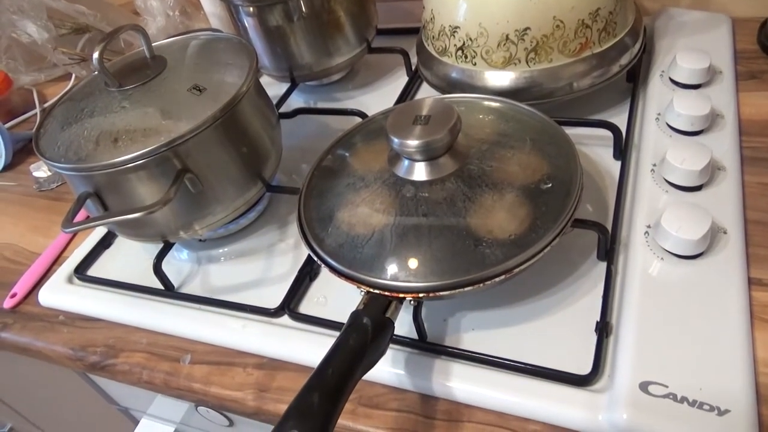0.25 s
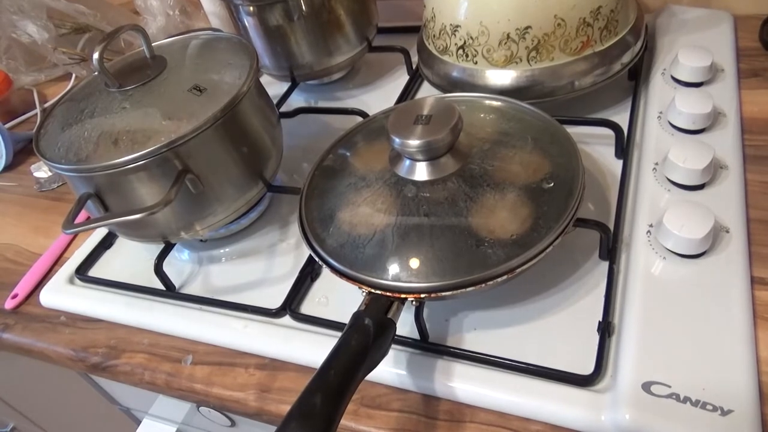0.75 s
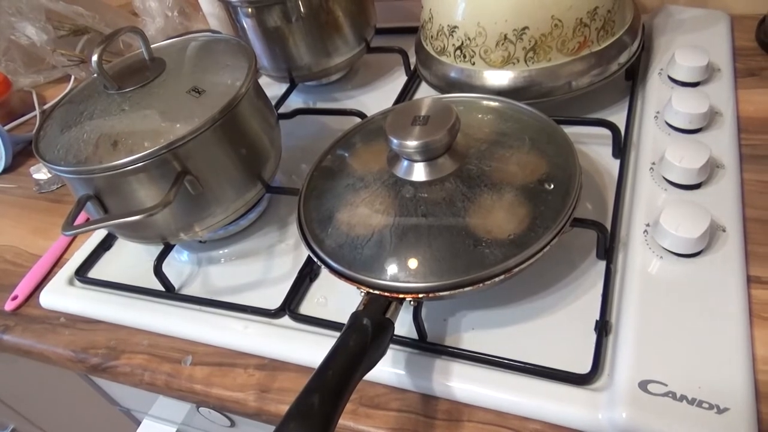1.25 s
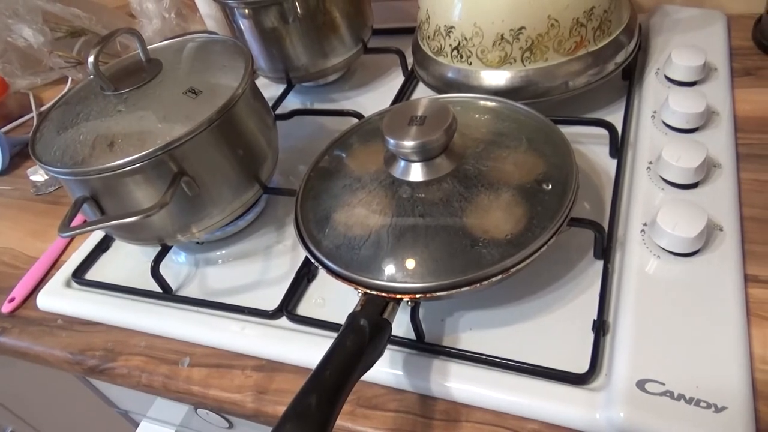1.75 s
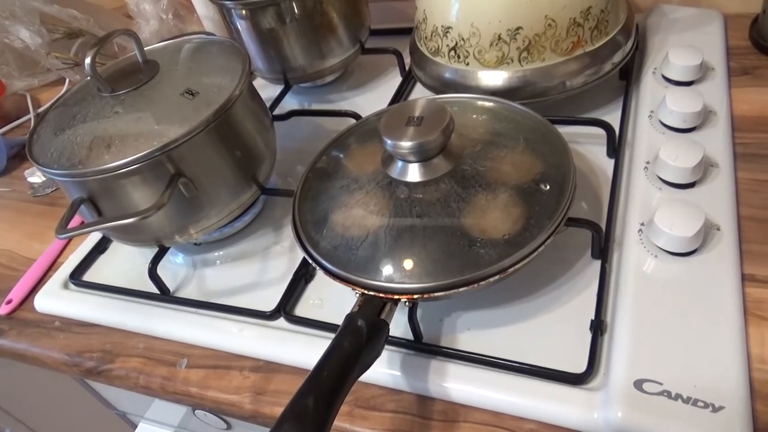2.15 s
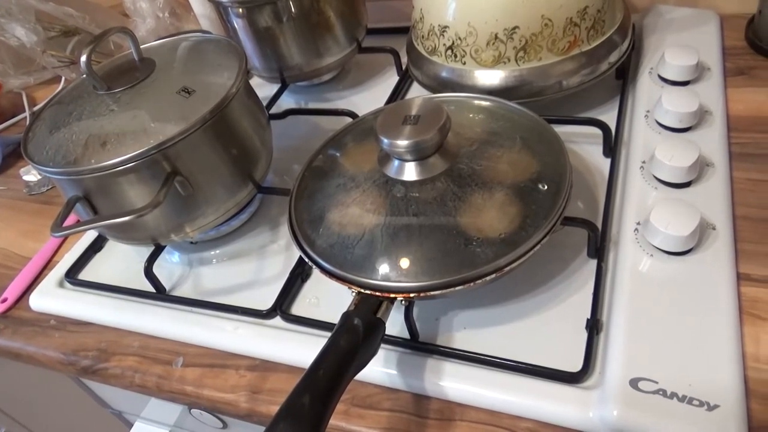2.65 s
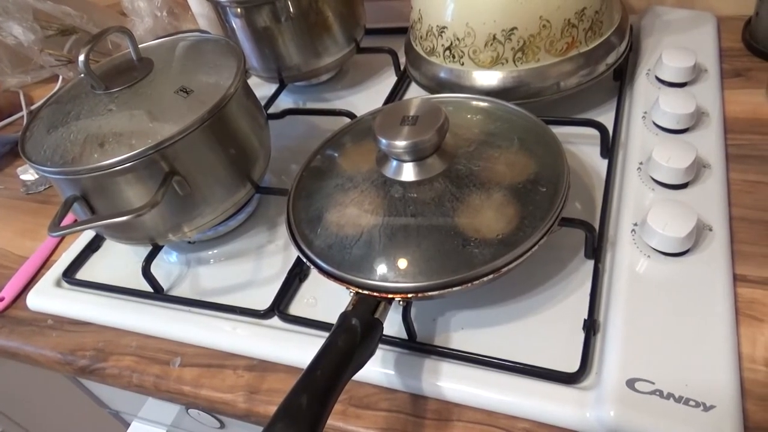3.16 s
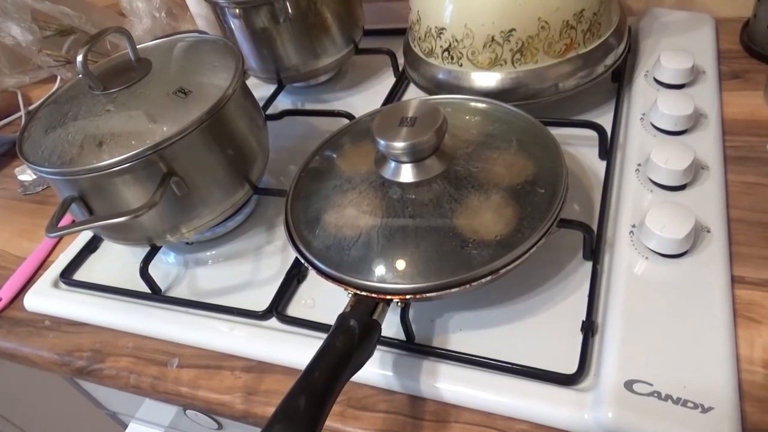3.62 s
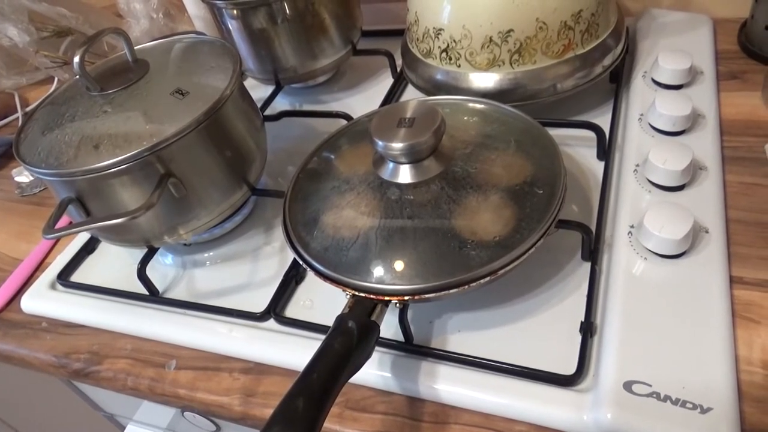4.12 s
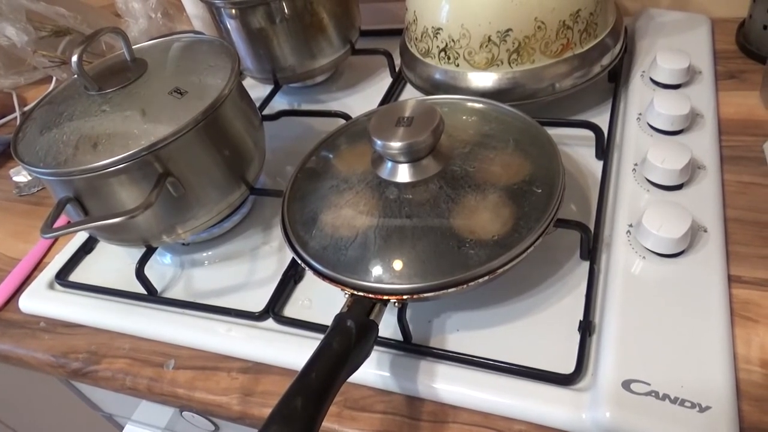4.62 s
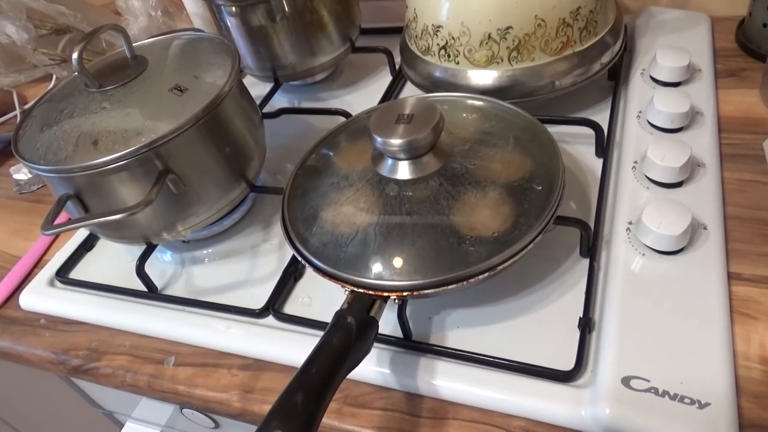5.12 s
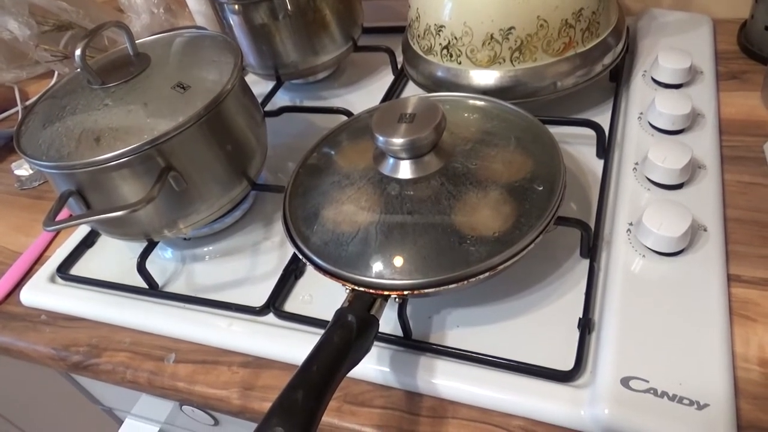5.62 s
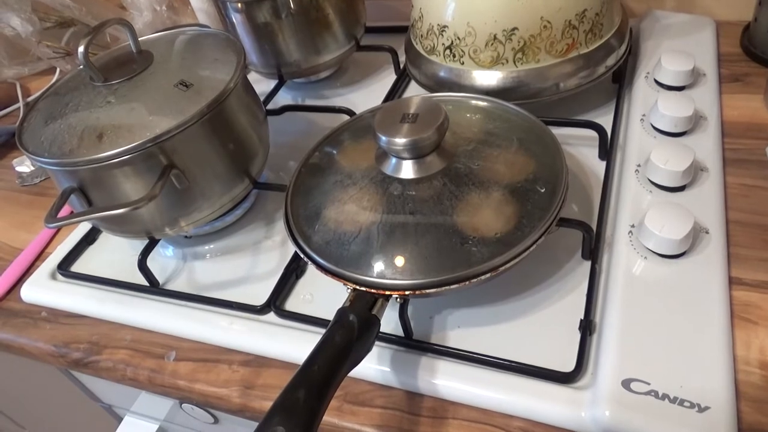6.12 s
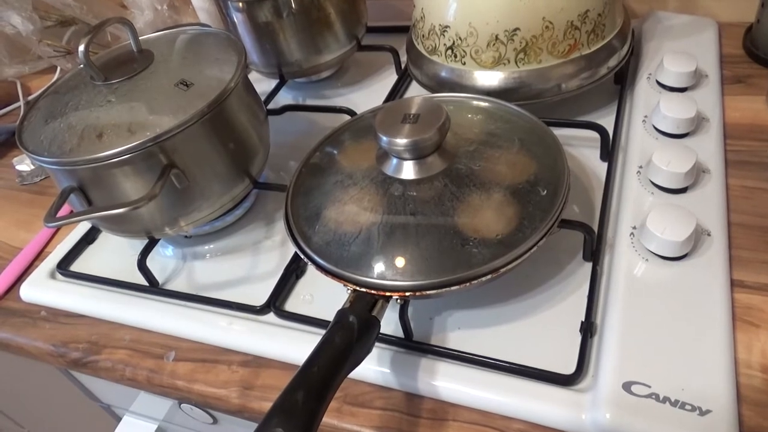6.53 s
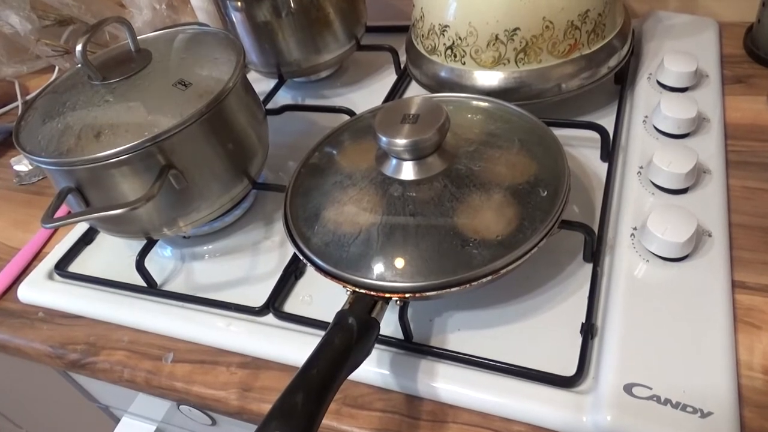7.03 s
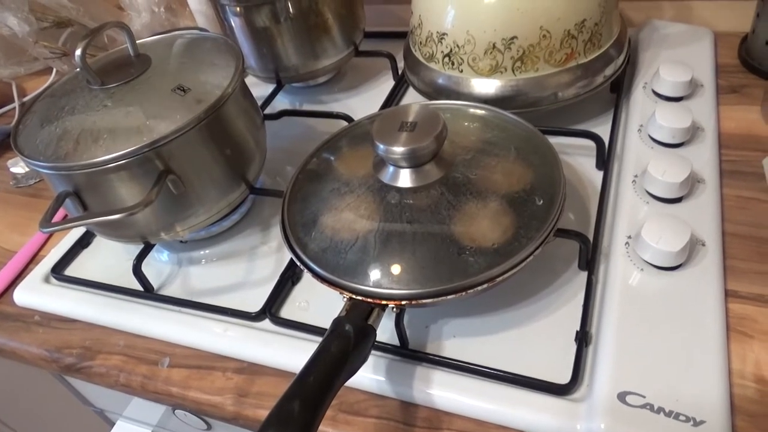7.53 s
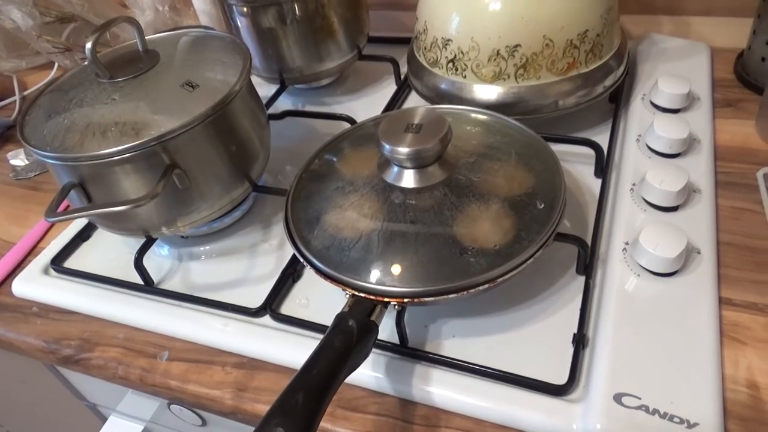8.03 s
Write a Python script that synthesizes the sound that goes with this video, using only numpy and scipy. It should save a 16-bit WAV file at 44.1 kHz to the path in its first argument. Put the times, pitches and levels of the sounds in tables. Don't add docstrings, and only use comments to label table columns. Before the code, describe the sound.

Vegetable slices fry under a glass lid on a gas stove, a dense bright sizzle peppered with sharp irregular pops, spits and crackles.

```python
import sys
import numpy as np
from scipy import signal
from scipy.fft import rfft, irfft, next_fast_len
from scipy.io import wavfile
from scipy.ndimage import uniform_filter1d

SR = 44100
rng = np.random.default_rng(int(sys.argv[2]) if len(sys.argv) > 2 else 0)


def unload_audio(sound):
    columns = np.transpose(np.atleast_2d(sound))
    steps = np.round(np.clip(columns, -1, 1) * 32767)
    wavfile.write(sys.argv[1], SR, steps.astype(np.int16))


def convert_level_to_amplitude(level_db):
    exponent = np.asarray(level_db, float) / 20
    return 10 ** exponent


N = 364707
T = np.arange(N) / SR

# start_s, peak_db
THUMPS = [(0.135, -32), (0.392, -32.5), (0.875, -25), (0.942, -30), (1.592, -30.5), (1.636, -26.5),
          (1.687, -24.5), (2.129, -34.5), (2.233, -28), (2.975, -30), (3.019, -25), (3.328, -30.5),
          (3.785, -34.5), (3.975, -29.5), (4.019, -26.5), (4.22, -31.5), (4.433, -31.5), (4.616, -40),
          (5.693, -29), (5.845, -30.5), (5.896, -24.5), (6.17, -34), (6.551, -33.5), (6.631, -28.5),
          (6.696, -33.5), (7.335, -28), (7.721, -27), (7.866, -32), (7.907, -35), (8.1, -31)]
# start_s, peak_db
BUMPS = [(0.635, -35.5), (2.27, -30), (2.554, -33.5), (3.255, -35.5), (3.426, -29.5), (3.482, -37),
         (3.508, -36), (4.767, -41.5), (4.845, -30.5), (4.872, -34.5), (6.207, -31.5), (7.373, -38.5),
         (7.759, -34.5), (8.128, -29.5)]
# start_s, peak_db
LID_DROPS = [(0.188, -29.5), (0.3892, -22.5), (0.9178, -26.5), (1.0935, -22.5), (1.3322, -33),
             (2.1279, -25.5), (2.3257, -28), (2.606, -22.5), (2.7473, -25.5), (2.977, -31.5), (3.0846, -29),
             (3.3265, -24), (3.6053, -29), (3.7839, -24.5), (3.9737, -23.5), (4.1595, -27), (4.2182, -37),
             (5.1601, -25.5), (5.5482, -28), (5.7808, -34), (5.8053, -31), (5.892, -25), (5.9197, -23),
             (6.0407, -34.5), (6.087, -30.5), (6.1876, -26), (6.6929, -18.5), (7.091, -23), (7.3345, -23.5),
             (7.9042, -24)]


def level(x, db):
    return x * convert_level_to_amplitude(db) / np.sqrt(np.mean(x ** 2))


def colour(x, points):
    hz, db = np.transpose(points)
    size = next_fast_len(N)
    f = np.arange(size // 2 + 1) * SR / size + 1
    gain = convert_level_to_amplitude(np.interp(np.log(f), np.log(hz), db))
    return irfft(rfft(x, size) * gain, size)[..., :N]


def ring(x, modes):
    t = np.arange(SR // 3) / SR
    body = sum(convert_level_to_amplitude(db - 60 * t / t60_s) * np.cos(2 * np.pi * hz * t) / t60_s for hz, db, t60_s in modes)
    return signal.fftconvolve(x, body * 2 * np.log(1000) / SR)[:N]


def walk(rate_hz):
    hold_n = int(SR / rate_hz)
    steps = np.repeat(rng.standard_normal(N // hold_n + 1), hold_n)
    return 1.395 * uniform_filter1d(uniform_filter1d(steps, hold_n), hold_n)[:N]


def bursts(start_s, peak_db, hz, octaves, skirt_db, spit_s, t60_s, skirt_octaves=1.35):
    grain_n = 1024
    t = np.arange(grain_n) / SR
    f = np.arange(grain_n // 2 + 1) * SR / grain_n + 1
    hz = np.asarray(hz)[:, None]
    decay = convert_level_to_amplitude(-60 * np.maximum(t - spit_s, 0) / t60_s * (hz / 7000) ** 0.359)
    attack = np.minimum(t / 0.000209, 1)
    off = np.log2(f / hz)
    core = np.exp(-.5 * (off / octaves) ** 2)
    skirt = convert_level_to_amplitude(skirt_db)[:, None] * np.exp(-.5 * (off / skirt_octaves) ** 2)
    noise = rfft(rng.standard_normal((len(start_s), grain_n)))
    grains = decay * attack * irfft(noise * (core + skirt))
    grains *= (convert_level_to_amplitude(peak_db) / np.abs(grains).max(axis=1))[:, None]
    where = (np.asarray(start_s) * SR).astype(int)[:, None] + np.arange(grain_n)
    return np.bincount(where.ravel(), grains.ravel(), N + grain_n)[:N]


def kitchen(x, t60_s, db):
    t = np.arange(SR // 3) / SR
    tail = rng.standard_normal(len(t)) * convert_level_to_amplitude(-60 * t / t60_s) * (t > .002)
    return convert_level_to_amplitude(db) * signal.fftconvolve(x, tail / np.sqrt(np.sum(tail ** 2)))[:N]


def burners():
    # hz, db_per_hz
    gas = [(25, -12.5), (100, -10), (220, -2.5), (500, 1), (900, 3), (2000, -1.5), (5000, -7.5),
           (9600, -17), (14700, -3.5), (16400, -5.5)]
    # time_s, level_db
    whistle_db = [(0, -46.5), (2, -55), (2.6, -49), (4.5, -53), (6, -49.5), (8.27, -50.5)]
    # pitch_hz, level_db (only the pitch is used)
    jet_early = [(9711, -50)]
    jet_late = [(9717, -49)]
    hz = np.interp(T, [3.4, 7.1], [jet_early[0][0], jet_late[0][0]])
    phase = 2 * np.pi * np.cumsum(hz + 4 * walk(40)) / SR
    jet_db = np.interp(T, *np.transpose(whistle_db)) + 1.85 * walk(25)
    whistle = np.sqrt(2) * convert_level_to_amplitude(jet_db) * np.sin(phase)
    flicker = convert_level_to_amplitude(1.05 * walk(6.5))
    hiss = level(colour(rng.standard_normal(N), gas), -49.0)
    return hiss * flicker + whistle


def thumps(air_db):
    # hz, gain_db, t60_s
    lid_air = [(169.4, -10.5, 0.166), (284.2, -8, 0.174), (344.37, -6, 0.294), (390.04, -4.5, 0.0745),
               (420.56, 3, 0.212), (445.4, 0.5, 0.206), (464.2, -10.5, 0.263), (402.9, -12, 0.129)]
    # hz, gain_db, t60_s
    deep_air = [(138.7, -11.5, 0.0492)]
    lid_push_db = -17
    start_s, peak_db = np.transpose([*THUMPS, *BUMPS] + [(s, db + lid_push_db) for s, db in LID_DROPS])
    push = np.bincount(((start_s - .0008) * SR).astype(int), convert_level_to_amplitude(peak_db + 43.5), N)[:N]
    patter = ring(rng.standard_normal(N) * convert_level_to_amplitude(4.45 * walk(45)), lid_air)
    flex = ring(push ** 2 / push.max(), deep_air)
    air = ring(push, lid_air) - flex + level(patter, -1.56) * convert_level_to_amplitude(air_db)
    gap = [(120, -14.5), (300, 1.29), (470, 3.0), (560, -5.5), (900, -3)]
    return colour(air, gap)


def sizzle(fry_db, count=6000):
    # hz, gain_db
    bed_db = [(900, -6), (1500, -12.5), (3000, -7), (5000, -4.5), (7000, -4), (9500, 2), (11500, -4.5),
              (14500, 9)]
    chance = rng.random((count, 4)).T
    start_s = chance[0] * N / SR
    size_db = 9 * chance[1] ** 14
    hz = 1200 * 2 ** (3.376 * chance[2])
    fine = bursts(start_s, size_db, hz, 0.224, -12 * chance[3], 0.00275, 0.0181)
    fine = level(colour(fine, bed_db), -3.5)
    thinning = np.interp(T, [2.2, 2.5], [.35, -.1])
    finest = colour(fine, [(6500, -12.5), (9000, -4.5)]) * thinning
    flurries_db = 1.22 * walk(25)
    return (fine + finest) * convert_level_to_amplitude(fry_db + flurries_db)


def stray_droplets(count=170):
    chance = rng.random((count, 3)).T
    start_s = chance[0] * N / SR
    peak_db = -35.5 - 2.5 * np.log(chance[1] + 0.092)
    hz = 2000 * 2 ** (1.59 * chance[2])
    return bursts(start_s, peak_db, hz, 1.0, 0 * start_s - 8, 0.00055, 0.0083)


def ticks():
    # start_s, peak_db, colour_hz
    bright_ticks = [(0.062, -22, 9700), (0.1538, -22.5, 9780), (0.2447, -22.5, 10300), (0.4669, -18, 10120),
                    (0.5993, -26, 9650), (0.6584, -22, 8570), (0.6747, -27.5, 7710), (0.8123, -24.5, 8570),
                    (1.0513, -23, 9390), (1.3086, -24, 9990), (1.3333, -25.0, 8570), (1.3448, -22, 8910),
                    (2.0508, -36.5, 9600), (2.1484, -22, 9300), (2.1835, -20.5, 8070), (2.2873, -23, 7750),
                    (2.3208, -19.5, 9750), (2.4857, -27, 7710), (2.5376, -30.5, 9820),
                    (2.5905, -17.5, 8130), (2.6941, -23, 9860), (2.7525, -22.5, 9500), (2.9343, -22, 9620),
                    (2.9762, -21, 8610), (3.2328, -23.5, 8350), (3.459, -21.5, 10200), (3.525, -22.5, 8480),
                    (3.5807, -19, 8530), (3.6935, -21.5, 8350), (3.869, -20.5, 9000), (4.0173, -20, 8910),
                    (4.0945, -23.5, 9780), (4.1325, -23, 8660), (4.1543, -23, 10210), (4.3068, -17.5, 8570),
                    (4.5438, -28.5, 8570), (4.8338, -22, 8500), (4.9234, -36.5, 8400),
                    (5.0472, -26.5, 8200), (5.4731, -23, 8350), (5.5486, -21.5, 8570),
                    (5.6602, -20.5, 8400), (5.87, -18, 9690), (5.8938, -18, 8760), (6.0388, -22, 9550),
                    (6.2057, -23.5, 8330), (6.3463, -14.5, 9700), (6.3802, -28.5, 9040),
                    (6.43, -24.5, 9740), (6.766, -19.5, 8530), (6.8673, -19, 9100), (7.3715, -22.5, 8300),
                    (7.4559, -26.5, 8270), (7.5476, -22.5, 10290), (7.5802, -24, 9050), (7.6956, -20, 9700),
                    (7.994, -24, 8910), (8.0883, -20.5, 8790), (8.0989, -17, 8480), (8.1104, -17.5, 7880)]
    # start_s, peak_db, colour_hz
    middle_ticks = [(0.0465, -20.5, 6730), (0.3787, -24.5, 4310), (0.5328, -21, 7420), (0.8742, -27, 6200),
                    (0.9404, -20.5, 7330), (0.9887, -24.5, 4390), (1.1035, -20, 7360), (1.2656, -22, 6120),
                    (1.2946, -23.5, 7490), (1.3326, -21.5, 5860), (1.4364, -23, 6680), (1.4919, -12, 6880),
                    (1.5125, -20.5, 7360), (1.8679, -28.5, 4350), (1.8809, -20, 6470), (2.2094, -22, 7490),
                    (2.2867, -20, 7430), (2.3884, -26.5, 4350), (2.5376, -24.5, 6800), (2.6943, -22, 7080),
                    (2.7931, -23, 6760), (3.0172, -19, 6310), (3.2775, -24, 6720), (3.4132, -23, 4330),
                    (3.4482, -23, 4580), (3.6937, -22, 7440), (3.8195, -13, 4770), (3.9206, -22.5, 5330),
                    (4.0173, -33.5, 4480), (4.0668, -26, 3830), (4.1327, -25, 5440), (4.3917, -21, 7240),
                    (4.5319, -22.5, 7430), (4.5872, -36, 7280), (4.6159, -27, 5600), (4.9951, -32, 6370),
                    (5.2376, -29, 6720), (5.6599, -23.5, 7150), (5.7204, -22.5, 7100),
                    (5.8222, -19.5, 5300), (5.8787, -17, 6260), (6.0871, -24.5, 6300), (6.2639, -25, 6290),
                    (6.5523, -22, 4450), (6.7512, -22.5, 6590), (7.1673, -20.5, 4350),
                    (7.3618, -21.5, 6450), (7.423, -26, 7190), (7.4794, -24, 6290), (7.5535, -22, 5200),
                    (7.5803, -28, 6460), (7.6653, -23.5, 4390), (7.7666, -25.5, 4840), (8.0543, -25, 5470),
                    (8.1712, -28, 7280)]
    # start_s, peak_db, colour_hz
    dull_ticks = [(0.0823, -37, 1266), (0.4341, -24, 3080), (0.4673, -33.5, 1310), (0.6486, -27, 3060),
                  (0.9404, -31.5, 1180), (1.1336, -28.5, 3790), (2.016, -27, 1380), (2.0338, -30, 1287),
                  (2.3886, -31, 2580), (2.5525, -27.5, 1384), (2.9764, -27, 1340), (3.0526, -22.5, 3580),
                  (3.3487, -22, 2470), (3.4037, -23.5, 3250), (3.6939, -27.5, 2930), (3.7036, -34, 1390),
                  (3.7491, -34.5, 1344), (3.7969, -26.5, 3400), (3.9205, -27.5, 1460),
                  (3.9399, -26.5, 2670), (4.0032, -26.5, 1310), (4.0167, -21, 2240), (4.0668, -25.5, 3750),
                  (4.092, -32, 1175), (4.2181, -27, 3160), (4.3917, -29.5, 1467), (4.6158, -25, 2240),
                  (4.7793, -32, 1274), (5.1504, -24, 3070), (5.2381, -32.5, 1407), (5.3453, -32.5, 1520),
                  (5.6886, -27, 2210), (6.3461, -22, 3320), (6.4406, -29, 3060), (6.4559, -26.5, 3010),
                  (7.127, -36.5, 1350), (7.5127, -25.5, 3790), (7.6958, -27, 1350), (7.7191, -27.5, 1195),
                  (7.7655, -25, 3010), (7.7789, -27, 3010), (7.989, -34.5, 1390), (7.9988, -23.5, 3460),
                  (8.1726, -29, 2150), (8.1841, -25, 3750)]
    kinds = [(bright_ticks, -1.5, .12, -14, .016),  # table, gain_db, octaves, skirt_db, t60_s
             (middle_ticks, -1.5, .12, -14, .018),
             (dull_ticks, -2.5, .14, -10, .02)]
    out = 0
    for table, gain_db, octaves, skirt_db, t60_s in kinds:
        s, peak_db, hz = np.transpose(table)
        out = out + bursts(s - .0005, peak_db + gain_db, hz, octaves, 0 * s + skirt_db, 0.00088, t60_s, 1.0)
    return out


def fizzes():
    # start_s, peak_db, pitch_hz
    jets = [
        (2.238, -27.5, 2203),
        (2.24, -27.5, 2915),
        (1.692, -31, 2964),
        (6.703, -34.5, 2660),
        (6.737, -27, 7000),
        (6.831, -22, 5370),
        (8.01, -32.5, 4500),
    ]
    s, peak_db, hz = np.transpose(jets)
    return bursts(s, peak_db, hz, 0.0674, 0 * s - 20, 0.0139, 0.013)


def lid_shakes():
    s, peak_db = np.transpose([*THUMPS, *BUMPS])
    return bursts(s, peak_db - 1.5, 0 * s + 1900, 1.0, 0 * s - 30, 0.00067, 0.0626)


def thrown_drops():
    # start_s, peak_db, colour_hz
    splashes = [(0.634, -24, 2890), (0.6968, -23.5, 2920), (0.7867, -18, 3205), (1.687, -33.5, 3030),
                (1.947, -25, 2940), (2.2313, -34.5, 2920), (2.5366, -25.5, 2560), (2.59, -27.5, 2540),
                (3.017, -38.5, 2960), (3.2325, -24, 3230), (3.3021, -25.5, 2120), (3.9739, -35.5, 2470),
                (4.2526, -20, 3220), (4.4324, -20, 2550), (4.5871, -24, 3020), (4.7995, -22.5, 3100),
                (5.027, -17.5, 3370), (5.0517, -18, 3000), (5.1616, -29, 2460), (5.4748, -24.5, 3397),
                (5.8413, -20, 3530), (5.9395, -27, 3020), (6.2412, -28, 3040), (6.5508, -27, 3000),
                (6.7678, -25, 2550), (6.909, -22, 3150), (7.1379, -25.5, 2600), (7.665, -23, 2550),
                (8.076, -23, 2550), (8.126, -31.5, 2970)]
    lid_hz, lid_tick_hz = 1379.4, 2790
    s, peak_db, hz = np.transpose([*splashes] + [(s, db - 8.5, lid_hz) for s, db in LID_DROPS])
    slap = bursts(s, peak_db + 2.0, hz, 0.0775, 0 * s - 5, 0.00093, 0.0237)
    s, peak_db = np.transpose(LID_DROPS)
    return slap + bursts(s, peak_db + 0.5, 0 * s + lid_tick_hz, 0.77, 0 * s - 30, 0.00165, 0.0063)


def squeals():
    # start_s, peak_db, pitch_hz
    smallest = [(0.046, -24, 9800), (0.3028, -15, 9440), (0.3784, -21, 8610), (1.2164, -21, 9500),
                (1.295, -17, 9270), (1.3967, -14.5, 9520), (1.602, -13.5, 9700), (1.6484, -14.5, 8700),
                (2.2581, -14.5, 9600), (2.819, -14.5, 8390), (2.9611, -16, 10040), (3.846, -17.5, 10050),
                (3.901, -17.5, 8670), (4.4047, -19, 9860), (4.523, -18.5, 8400), (4.7657, -18.5, 8630),
                (5.037, -16, 9550), (5.4614, -22, 9300), (5.6376, -15.5, 8530), (5.659, -20.5, 9400),
                (5.983, -18, 8200), (6.4157, -18, 9300), (6.54, -22.5, 8440), (6.562, -14.5, 8120),
                (6.854, -10.5, 9520), (7.4231, -21.5, 8550), (7.524, -14, 9550), (7.865, -7.5, 11000)]
    s, peak_db, hz = np.transpose(smallest)
    return bursts(s, peak_db - 4.5, hz, 0.063, 0 * s - 20, 0.00051, 0.0159)


def pops():
    # start_s, peak_db, colour_hz
    largest = [(0.6081, -10.5, 8600), (0.877, -15, 9800), (1.1334, -14, 9750), (1.3189, -17, 7070),
               (1.49, -22.5, 7130), (1.5383, -14.5, 9940), (1.636, -14.5, 9410), (1.6865, -12, 9090),
               (1.946, -19, 9100), (2.016, -17, 9860), (2.2098, -20, 8450), (2.2317, -7.5, 8540),
               (2.5517, -11.5, 7400), (3.2327, -14, 9040), (3.3036, -9, 8900), (3.4984, -19.5, 6300),
               (4.3924, -17, 10440), (4.4319, -13.5, 7040), (4.5311, -19, 8600), (4.6046, -17, 8640),
               (4.6381, -22, 8600), (4.6769, -22, 8570), (4.8238, -16, 10240), (4.9227, -14.5, 8800),
               (5.87, -21, 6200), (6.344, -20.5, 9000), (7.0388, -19, 6200), (7.5125, -12, 9200),
               (7.864, -11.5, 6550), (8.1545, -12, 7980)]
    # start_s, peak_db, colour_hz
    spits = [(0.0824, -17.5, 9440), (0.1071, -19, 9720), (0.39, -18, 9770), (0.5327, -23, 8460),
             (0.7297, -19.5, 9840), (0.9621, -17.5, 8660), (1, -17, 8960), (1.0902, -13.5, 10000),
             (1.437, -22, 8770), (1.879, -14.5, 10640), (2.033, -15, 9900), (2.3726, -19, 10200),
             (2.381, -17.5, 10050), (2.474, -14.5, 7940), (3.0678, -19, 9160), (3.3931, -21, 10020),
             (3.6706, -20.5, 8460), (4.252, -19, 8540), (4.8447, -12.5, 9410), (5.005, -17.5, 9600),
             (5.689, -15, 9410), (6.1608, -20, 8130), (6.6502, -13.5, 9240), (7.357, -26.5, 9720),
             (7.409, -18, 8640), (7.659, -23, 8560), (7.9069, -14, 9860), (8.075, -19, 9880),
             (8.1236, -13, 8510), (8.209, -20, 9500)]
    # start_s, peak_db, pitch_hz
    chirps = [(0.165, -19.5, 6000), (0.3128, -20.5, 6430), (1.491, -23.5, 7200), (1.5902, -16.5, 6045),
              (1.7527, -25, 7400), (2.0156, -34, 6310), (2.3991, -26, 6780), (2.5666, -23, 7320),
              (2.589, -20.5, 6520), (2.7716, -24, 5930), (2.9805, -18.5, 6110), (3.5584, -25, 7210),
              (3.6102, -22.5, 7200), (3.702, -18.5, 7400), (3.931, -23, 6820), (4.5338, -24, 7330),
              (5.002, -23.5, 6270), (5.28, -21, 6670), (5.3636, -23, 7400), (5.5834, -22, 7400),
              (5.8867, -23, 6660), (6.2886, -23.5, 6510), (6.51, -16.5, 8170), (6.7564, -25.5, 6520),
              (6.7727, -21, 7400), (7.443, -16, 6130), (7.694, -26.5, 7300), (7.904, -25, 6620),
              (8.0986, -23, 7070), (8.1107, -35, 7400)]
    # start_s, peak_db, pitch_hz
    blips = [(0.608, -17, 4500), (0.7502, -19, 5600), (0.9279, -22.5, 5370), (1.867, -39, 4420),
             (2.016, -21, 4680), (2.551, -22.5, 4580), (3.1917, -17, 5310), (3.47, -21, 4790),
             (3.5073, -26.5, 3770), (3.8188, -25, 4670), (4.002, -24, 4330), (4.028, -15, 4305),
             (4.3066, -19.5, 4655), (4.6147, -29.5, 5480), (4.834, -19.5, 4620), (5.0064, -20.5, 3770),
             (5.0519, -21, 5250), (5.836, -16.5, 5060), (5.85, -21, 3660), (6.4401, -23, 4760),
             (6.631, -18, 5370), (6.8377, -20.5, 5160), (6.9135, -19.5, 4820), (7.0587, -25, 5150),
             (7.1346, -17, 4400), (7.2, -27, 5150), (7.5615, -18.5, 5390), (7.778, -22, 5090),
             (7.9635, -17.5, 4950), (7.9975, -22, 4430)]
    s, peak_db, hz = np.transpose([*largest, *spits, *chirps, *blips])
    skirt_db = -15.0 + 1.34 * (peak_db + 21.0)
    spit = bursts(s, peak_db + 0.28, hz, 0.0801, skirt_db, 0.00144, 0.0281, 0.986)
    s, peak_db, hz = np.transpose(largest)
    crack = bursts(s, peak_db + 0.5, hz, 0.392, 0 * s - 30, 0.00029, 0.0054)
    return spit + crack


def pan_and_lid(big, small):
    # hz, gain_db, t60_s
    pan_modes = [(1160.7, 7, 0.216), (1245, 5, 0.0572), (1293, 0.5, 0.0164), (1878.6, -0.5, 0.064),
                 (2224, 5.5, 0.268), (2550, 3, 0.074), (2946, -0.5, 0.01674), (3770, -9, 0.153),
                 (4400, -7, 0.0242), (5370, -4.5, 0.12), (6120, -5, 0.082), (6585, -3, 0.0242),
                 (7200, -4.5, 0.0156), (7400, -2.5, 0.059), (8510, 0, 0.0199)]
    ringing = ring(convert_level_to_amplitude(2.0) * big + convert_level_to_amplitude(-1.5) * small, pan_modes)
    return convert_level_to_amplitude(-2.0) * (big + small + ringing)


def stereo(mid, side):
    # hz, side_minus_mid_db
    side_db = [(40, -18.5), (200, -19), (420, -25.5), (600, -6), (1500, -11), (4000, -9.5), (8000, -11.5),
               (14000, -19.5)]
    # hz, left_minus_right_db
    lean_db = [(1000, -0.01), (2500, -1.62), (5000, -2.52), (9000, 0.37)]
    side = colour(side, side_db)
    lean = np.array(lean_db)
    return np.array([colour(mid, lean * [1, .5]) + side, colour(mid, lean * [1, -.5]) - side])


def scene():
    # time_s, sizzle_db
    fry = [(0.0, -36), (0.11, -37), (0.6, -35.5), (1.33, -37), (1.54, -37), (1.66, -36.5), (3.06, -37.5),
           (3.36, -35), (5.09, -37), (5.78, -35.5), (6.17, -37.5), (6.42, -36), (6.75, -36.5),
           (7.18, -40.5), (7.44, -38), (7.56, -37.5), (7.69, -35.5), (8.27, -35)]
    fry_db = np.interp(T, *np.transpose(fry))
    air_db = -50.5 + 0.61 * (fry_db - fry_db.mean())
    small = sizzle(fry_db + 2.5)
    big = stray_droplets() + ticks() + fizzes() + lid_shakes() + thrown_drops() + squeals() + pops()
    hits = pan_and_lid(big, small) + thumps(air_db)
    dry = hits + burners()
    mid = dry + kitchen(hits, 0.286, -9.0)
    return stereo(mid, kitchen(dry, 0.095, -1.46))


def top_cut(x):
    return signal.sosfilt(signal.butter(12, 16000, fs=SR, output="sos"), x)


def record(dry):
    # hz, gain_db
    mic = [(25, -12.5), (70, -7), (160, -2), (300, 0.37), (11000, 2), (13000, -7), (15700, -25.5),
           (16000, -24.5)]
    return top_cut(colour(dry, mic))


dry = scene()
out = record(dry)
unload_audio(out)
```